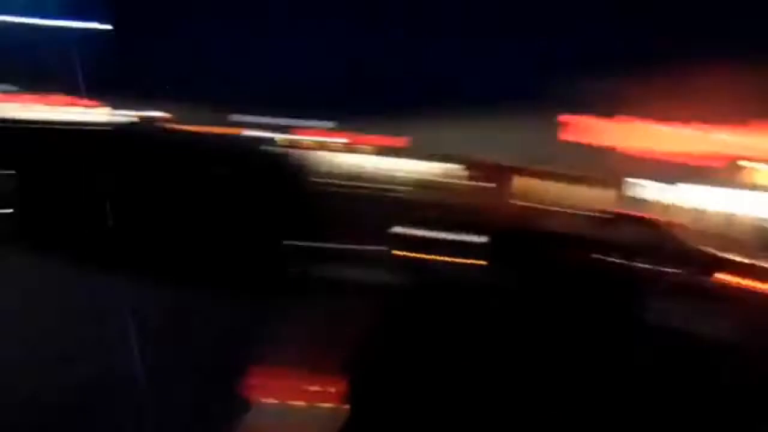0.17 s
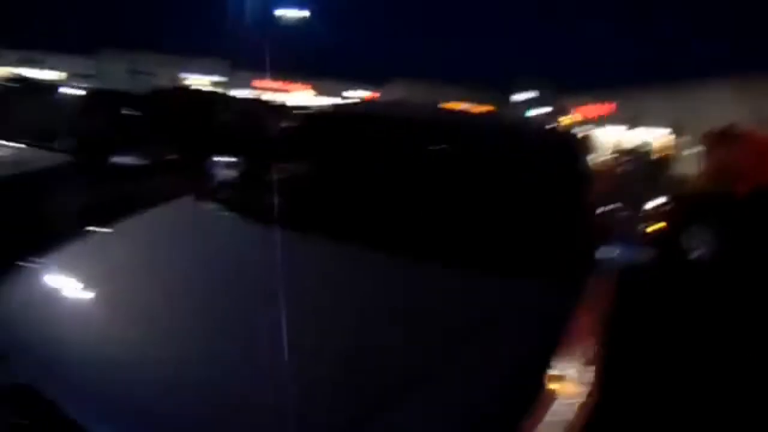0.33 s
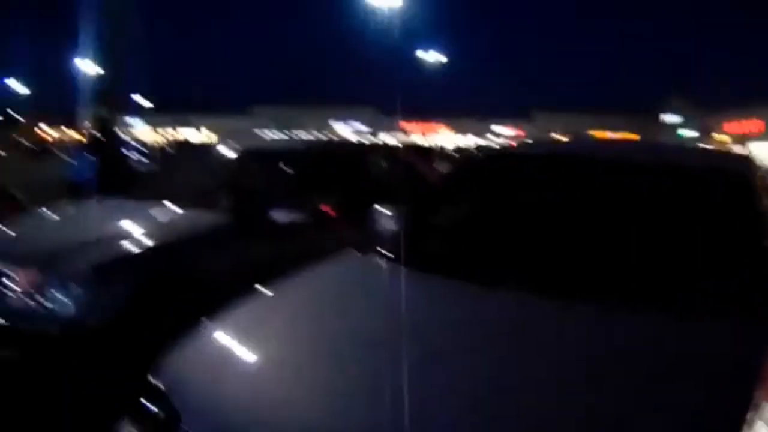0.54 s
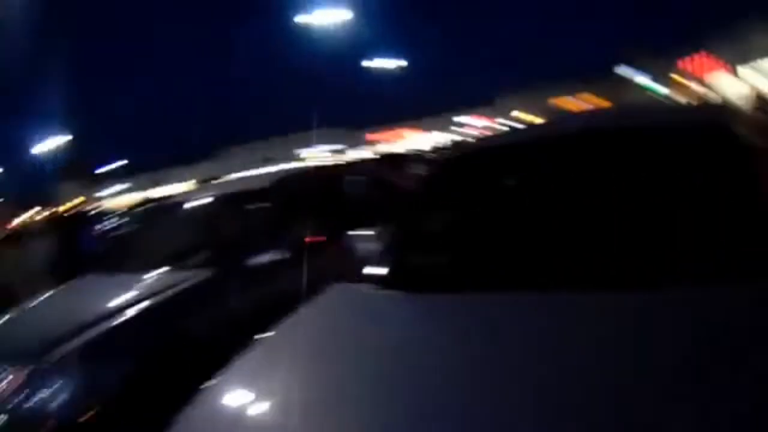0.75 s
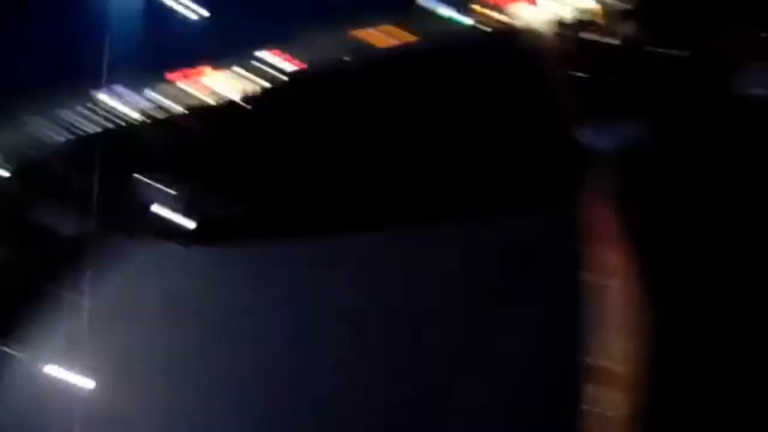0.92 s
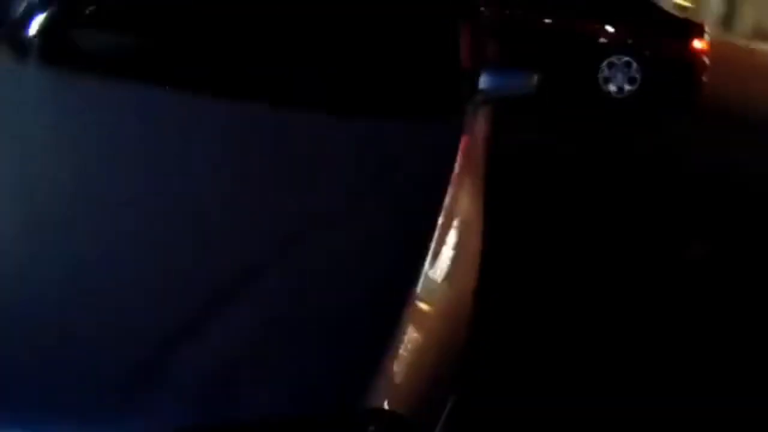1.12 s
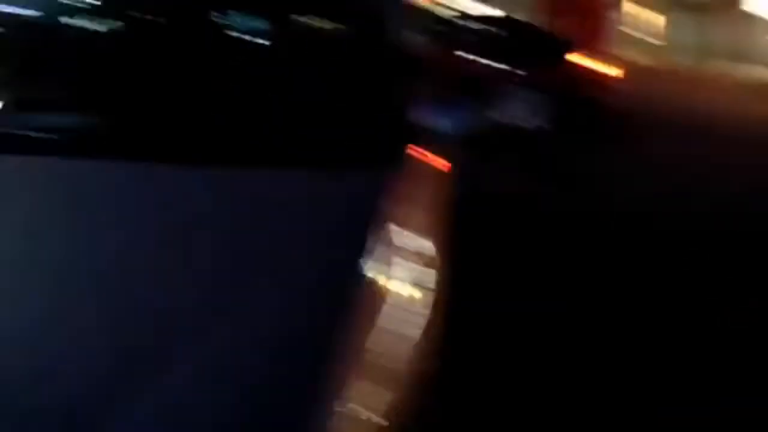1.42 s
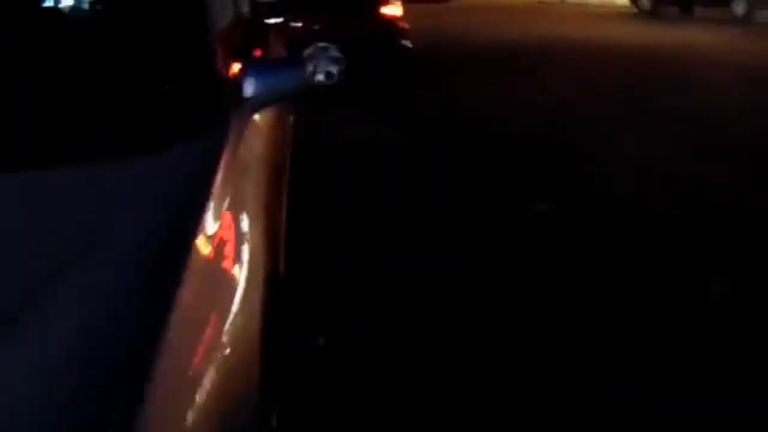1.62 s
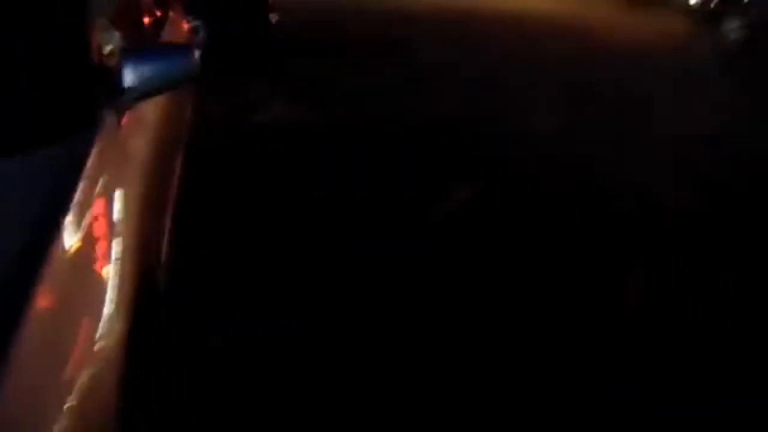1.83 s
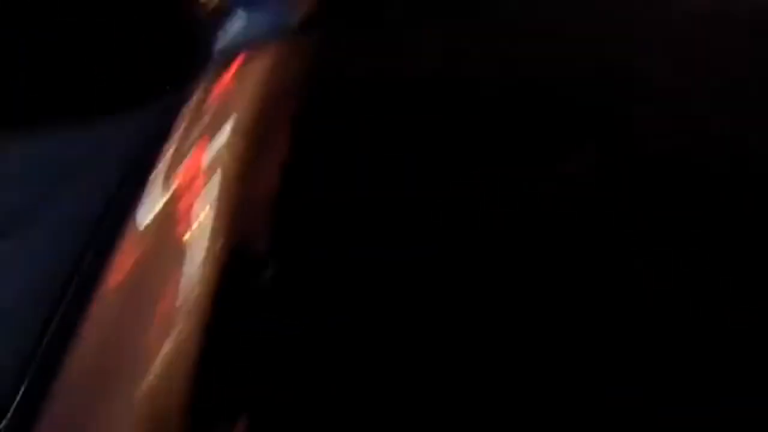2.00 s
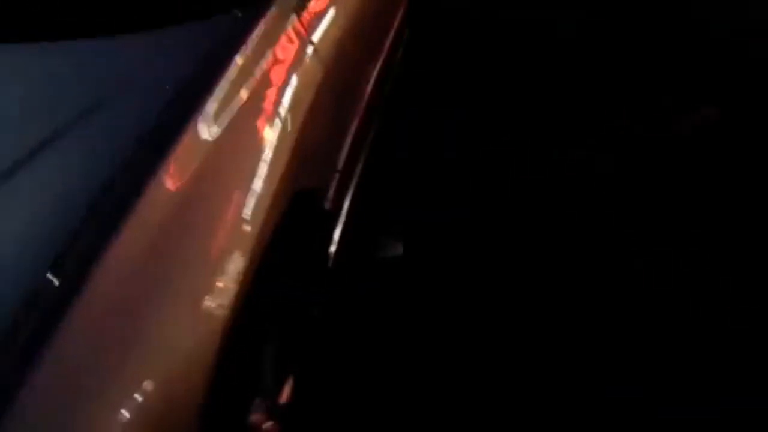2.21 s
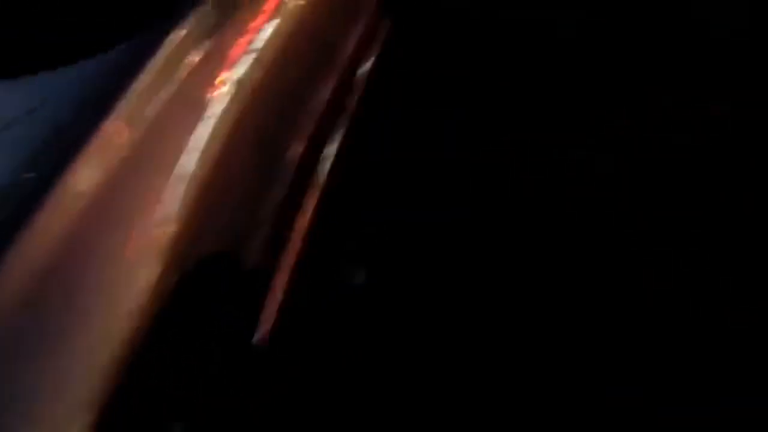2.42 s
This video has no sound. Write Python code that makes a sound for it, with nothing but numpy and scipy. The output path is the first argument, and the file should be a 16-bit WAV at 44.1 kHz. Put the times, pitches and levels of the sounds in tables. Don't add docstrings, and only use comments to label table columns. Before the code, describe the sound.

A car door slams almost at once, very close and overloading the microphone, with a cabin boom and brief key jingle; the background dips and returns, then a soft bump, a latch click and faint ticks.

```python
import sys
import numpy as np
from scipy import signal
from scipy.io import wavfile
from scipy.ndimage import uniform_filter1d

SR = 44100
rng = np.random.default_rng(int(sys.argv[2]) if len(sys.argv) > 2 else 0)


def digitize_waveform(pressure):
    field = np.atleast_2d(pressure).T
    bounded = np.clip(field, -1, 1)
    quanta = np.round(bounded * 32767).astype(np.int16)
    wavfile.write(sys.argv[1], SR, quanta)


def amplitude_ratio(level_db):
    exponent = np.asarray(level_db, float) / 20
    return 10 ** exponent


N = 112454

# pitch_hz, density_db (per Hz)
TRAFFIC_SPECTRUM = [(12, -41), (28, -1), (82, -0.5), (178, -3.5), (242, -25), (357, -15.5), (1510, -24),
                    (13400, -49), (15000, -67)]
TRAFFIC_DB, TRAFFIC_PATCHY_DB = -32.5, 1.2
FAN_HZ, FAN_T60_S, FAN_DB = 1530, 0.026, -50
HISS_DB, HISS_FROM_HZ = -51, 7700

# start_s, firing_pattern_hz, level_db, nearness (0 far to 2 near)
ENGINE_PATH = [
    (0, 36.1, -51.5, 0.16),
    (.5, 35.48, -28, 0.28),
    (.73, 36.34, -35, 0.13),
    (1.26, 36.37, -33, 0.54),
    (1.6, 36.35, -32.5, 0.63),
    (1.95, 36.09, -32.5, 0.96),
    (2.15, 36.3, -31, 1.28),
    (2.3, 36.08, -29.5, 1.534),
    (2.55, 36.28, -29.5, 1.22),
]
# multiple (of firing pattern), level_db
FAR_ORDERS = [(1, 7), (2, 7.5), (3, 6.5), (4, 0), (5, -1), (6, -12.5), (7, -35), (8, -15), (9, -9.5),
              (10, -11), (11, -17), (12, -16), (13, -13), (14, -22)]
# multiple (of firing pattern), level_db
MID_ORDERS = [(1, -42.5), (2, -3), (3, -4.5), (4, 4.5), (5, 0.5), (6, -4.5), (7, -3), (8, -6.5), (9, -3),
              (10, -2), (11, -19), (12, -8), (13, -35), (14, -8.5)]
# multiple (of firing pattern), level_db
NEAR_ORDERS = [(1, -43), (2, -8), (3, 18.5), (4, -6.5), (5, -10), (6, -4.5), (7, -28), (8, -16.5), (9, -14),
               (10, -11), (11, -19), (12, -3), (13, -1), (14, -12.5)]
ORDER_WANDER_DB, ORDER_WANDER_HZ = 2.0, 3.0
# centre_s, length_s, lift_db, pitch_hz
PANEL_BUZZES = [
    (2.1, 0.048, 10, 363),
    (1.98, 0.021, 12, 290),
]
# multiple (of firing pattern), level_db
VALVE_ORDERS = [(19, -13.5), (20, -26), (21, -19), (23, -15.5), (24, -11), (25, -18.5), (26, -16.5)]
VALVE_NEAR_DB, VALVE_WANDER_DB = 9.5, 6.5
# pitch_hz, density_db (per Hz)
CLATTER_SPECTRUM = [(150, -62), (250, -11), (364, -4.5), (397, -12), (600, -16), (844, -11.5),
                    (1210, -16.5), (13500, -48.5), (15000, -61)]
# start_s, level_db
CLATTER_LEVEL = [
    (0, -38.5),
    (.6, -45),
    (1.2, -35.5),
    (1.5, -34),
    (1.8, -34.5),
    (2.05, -31),
    (2.25, -32.5),
    (2.55, -31.5),
]
CLATTER_GATE, CLATTER_PATCHY_DB = 0.13, 1.0

# pitch_hz, density_db (per Hz)
SWING_SPECTRUM = [(12, -36), (20, -24), (48, -11), (143, 0), (192, -10), (313, -2), (359, -7), (5000, -37),
                  (6500, -58), (11000, -120)]
SWING_DB, SWING_END_S = -40.5, 0.29
# start_s, crack_db, panel_db, boom_db
SLAM_CONTACTS = [(0.239, -67, -23.5, -31), (.248, -11.5, -9, -24), (0.25, -9, -5, -9),
                 (0.256, -24, -10, -46), (0.259, -12.5, -4, -8), (0.266, -19, -10, 4.5),
                 (0.278, -22, -41, 5), (.287, -15.5, -3, -5.5), (0.294, -21.5, -7.5, -2),
                 (0.302, -26, -7.5, -19), (0.313, -43, -31, -17), (0.335, -25, -11.5, -13),
                 (.355, -43, -16.5, -24), (0.42, -54, -51, -22)]
# pitch_hz, density_db (per Hz)
CRACK_SPECTRUM = [(710, -9), (1200, 0), (2000, -5), (2800, 0), (4700, -11), (8000, -20), (13500, -24),
                  (15000, -35)]
CRACK_T60_S, PANEL_T60_S = 0.088, 0.092
LATE_S, LATE_CUT_HZ = 0.3, 11500
# pitch_hz, width_hz, level_db
DOOR_SKIN = [(244, 160, 2.5), (194, 40, 1.5), (366, 18, -1.5), (425, 24, -3.5), (446, 52, -0.5),
             (525, 19, -2), (630, 65, -4.5), (687, 46, -6), (850, 140, -2.5), (960, 72, -2.5),
             (1180, 82, -11), (1393, 30, -24.5)]
# pitch_hz, level_db, t60_s
CABIN_BOOM = [(36, -1, 0.42), (66.8, -6.5, 0.22), (144.5, -4, 0.066), (198, 1, 0.072)]
PUSH_HZ = 278
# start_s, level_db
STRIKES = [(0.2487, -15), (0.2506, -4), (.2535, -8), (.2575, -22), (0.2602, -8), (.265, -5), (0.273, -11),
           (0.2787, -6.5), (.2855, -28), (.2915, -10), (.2935, -14), (.301, -32), (.311, -40)]
# pitch_hz, level_db, t60_s
STRIKER_MODES = [(806, -3, 0.066), (958, -1.5, 0.044), (1168, -6.5, 0.017), (2760, -2, 0.017),
                 (3730, -20.5, 0.014), (3980, -11, 0.024)]
STRIKE_T60_S, STRIKE_FROM_HZ, STRIKE_TO_HZ = 0.01, 2300, 6500
# start_s, level_db, pitch_hz, t60_s
SETTLES = [
    (.2925, -4, 192, .14),
    (.362, -13, 62, .25),
    (.415, -11, 100, .3),
    (1.359, -11, 55, .11),
    (1.309, -28, 70, .15),
    (2.34, -27, 62, .2),
]
THUD_S, THUD_DB, THUD_HZ, THUD_T60_S = 0.2603, 11, 58, 0.2
SWAY_S, SWAY_DB, SWAY_HZ, SWAY_T60_S = 0.329, -1, 36, 0.3
TAIL_S, TAIL_DB, TAIL_T60_S, TAIL_CUT_HZ = 0.26, -9.5, 0.48, 1860

# start_s, level_db
JINGLES = [
    (.292, -33),
    (.320, -28),
    (.337, -30),
    (.354, -37),
    (.378, -46),
    (1.3468, -37),
    (1.395, -40),
    (1.405, -43),
]
# pitch_hz, level_db, t60_s
KEY_MODES = [(6300, -5, .01), (8700, -4, .01), (9700, 0, .013), (10800, -3, .01)]
# start_s, level_db
TICKS = [
    (.4943, -30),
    (.7113, -37),
    (1.951, -26),
    (1.9704, -24),
    (1.983, -24),
    (2.01, -33),
    (2.2209, -31),
    (2.2837, -31),
]
# pitch_hz, level_db, t60_s
TICK_MODES = [(1650, -9, .015), (3400, -7, .016), (3800, -7, .015), (4450, -10, .012)]

# start_s, rustle_db, panel_db, boom_db
BUMP_CONTACTS = [
    (0.194, -60, -38, -55),
    (1.31, -34, -19.5, -19),
    (1.342, -35, -32, -14),
    (1.348, -32.5, -32, -27),
    (1.354, -32, -40, -9),
    (1.362, -32, -13, -20),
    (1.381, -29.5, -18.5, -22),
    (1.394, -29.5, -24, -19.5),
    (1.405, -30.5, -19.5, -30),
    (1.453, -60, -19, -20.5),
]
# pitch_hz, density_db (per Hz)
RUSTLE_SPECTRUM = [(1000, -33), (1600, 6), (4800, -10), (7500, -15), (9700, -24), (12000, -21),
                   (14500, -18), (15000, -40)]
RUSTLE_T60_S, SOFT_ATTACK_S, BUMP_CUT_HZ = 0.04, 0.004, 500

# start_s, level_db
LATCH_SNAPS = [
    (1.8557, -13),
    (1.8601, -19),
]
# pitch_hz, level_db, t60_s
LATCH_MODES = [(980, -3, .018), (1210, 0, .024), (1620, -2, .022), (2100, -9, .014), (2600, -16, .006),
               (3000, -16, .012), (3350, -12, .012), (3800, -12, .006), (4400, -13, .006)]
STRENGTH_SPREAD_DB = 1.5
# start_s, length_s, level_db
SCRAPES = [
    (2.06, .05, -44),
    (2.115, .04, -40),
    (2.25, .018, -44),
]

# start_s, depth_db
DUCKS = [
    (0.269, 20),
    (1.36, 2),
]
DUCK_ATTACK_S, DUCK_RELEASE_S = 0.08, 0.84
CLIP_TOP, CLIP_HARDNESS = 0.88, 3.1
MIC_CUT_HZ, RUMBLE_CUT_HZ, CUTOFF_HZ = 30, 4, 14250


def seconds():
    return np.arange(N) / SR


def rms_one(x):
    return x / np.sqrt(np.mean(x ** 2) + 1e-20)


def in_time(rows):
    s, *columns = np.transpose(rows)
    return [np.interp(seconds(), s, c) for c in columns]


def low_pass(x, cut_hz):
    return signal.sosfilt(signal.butter(2, cut_hz, fs=SR, output="sos"), x)


def high_pass(x, cut_hz):
    return signal.sosfilt(signal.butter(1, cut_hz, "high", fs=SR, output="sos"), x)


def band_pass(x, low_hz, high_hz, order):
    return signal.sosfilt(signal.butter(order, [low_hz, high_hz], "band", fs=SR, output="sos"), x)


def drift(rate_hz):
    r = np.exp(-80 * np.pi * rate_hz / SR)
    white = rng.standard_normal(N // 40 + 2002)
    slow = signal.lfilter([1], [1, -2 * r, r * r], white)[2000:]
    return np.interp(np.arange(N) / 40, np.arange(len(slow)), rms_one(slow))


def coloured(spectrum, patchy_db):
    out = 0
    edges = 20 * 2 ** np.arange(0, 10, 0.5)
    white = rng.standard_normal((2, N))
    hz, db = np.transpose(spectrum)
    together = drift(1.01)
    for k, (low, high) in enumerate(zip(edges, edges[1:])):
        if high < hz[0] or low > hz[-1]:
            continue
        band = band_pass(white[k % 2], low, high, 2)
        level_db = np.interp(np.log(low * high) / 2, np.log(hz), db, left=-60, right=-60)
        flicker_db = patchy_db * (0.32 * together + drift(6.7))
        out = out + band * amplitude_ratio(level_db + flicker_db)
    return rms_one(out)


def clicks(s, db):
    out = np.full(N, 1e-18)
    out[(np.asarray(s) * SR).astype(int)] = amplitude_ratio(np.asarray(db))
    return out


def ring(x, hz, t60):
    r, w = amplitude_ratio(-60 / (t60 * SR)), 2 * np.pi * hz / SR
    return signal.lfilter([0, np.sin(w)], [1, -2 * r * np.cos(w), r * r], x)


def dying(s, db, t60):
    return signal.lfilter([1], [1, -amplitude_ratio(-60 / (t60 * SR))], clicks(s, db))


def struck(events, modes):
    s, db = np.transpose(events)
    spread = rng.normal(0, STRENGTH_SPREAD_DB, (len(s), len(modes)))
    rings = 0
    for k, (hz, level_db, t60) in enumerate(modes):
        rings = rings + (-1) ** k * ring(clicks(s, db + level_db + spread[:, k]), hz, t60)
    return band_pass(rings, 0.85 * modes[0][0], 1.15 * modes[-1][0], 3)


def skin():
    white = rng.standard_normal((len(DOOR_SKIN), N))
    modes = enumerate(DOOR_SKIN)
    return rms_one(sum(amplitude_ratio(db) * rms_one(ring(white[k], hz, 1.05 / width)) for k, (hz, width, db) in modes))


def boom(s, db):
    push = low_pass(clicks(s, db), PUSH_HZ)
    return sum(amplitude_ratio(level_db) * ring(push, hz, t60) for hz, level_db, t60 in CABIN_BOOM)


def traffic():
    rumble = amplitude_ratio(TRAFFIC_DB) * coloured(TRAFFIC_SPECTRUM, patchy_db=TRAFFIC_PATCHY_DB)
    fan = rms_one(ring(rng.standard_normal(N), FAN_HZ, FAN_T60_S))
    return rumble + amplitude_ratio(FAN_DB) * fan


def steady_hiss():
    return amplitude_ratio(HISS_DB) * high_pass(rng.standard_normal(N), HISS_FROM_HZ)


def engine():
    hz, db, near = in_time(ENGINE_PATH)
    turn = 2 * np.pi * np.cumsum(hz) / SR
    tables = np.array([FAR_ORDERS, MID_ORDERS, NEAR_ORDERS])[:, :, 1]
    start = rng.uniform(0, 2 * np.pi, len(FAR_ORDERS))
    out = 0
    for k in range(len(FAR_ORDERS)):
        level_db = np.interp(near, [0, 1, 2], tables[:, k])
        level_db += ORDER_WANDER_DB * drift(ORDER_WANDER_HZ)
        for s, length, lift_db, buzz_hz in PANEL_BUZZES:
            if round(buzz_hz / hz.mean()) == k + 1:
                level_db += lift_db * np.exp(-0.5 * ((seconds() - s) / length) ** 2)
        out = out + amplitude_ratio(level_db) * np.sin((k + 1) * turn + start[k])
    for multiple, level_db in VALVE_ORDERS:
        valve_db = level_db + VALVE_NEAR_DB * (near - 1.74) + VALVE_WANDER_DB * drift(4.3)
        out = out + amplitude_ratio(valve_db) * np.sin(round(multiple) * turn + rng.uniform(0, 2 * np.pi))
    clatter = coloured(CLATTER_SPECTRUM, patchy_db=CLATTER_PATCHY_DB) * (1 + CLATTER_GATE * np.cos(turn))
    return amplitude_ratio(db) * out + amplitude_ratio(in_time(CLATTER_LEVEL)[0]) * clatter


def door_swing():
    return amplitude_ratio(SWING_DB) * coloured(SWING_SPECTRUM, patchy_db=2.0) * (seconds() < SWING_END_S)


def slam():
    s, crack_db, panel_db, boom_db = np.transpose(SLAM_CONTACTS)
    noise, panel = coloured(CRACK_SPECTRUM, patchy_db=-1.0), skin()
    dull = low_pass(noise, LATE_CUT_HZ)
    late = s > LATE_S
    crack = dying(s[~late], crack_db[~late], CRACK_T60_S) * noise
    crack += dying(s[late], crack_db[late], CRACK_T60_S) * dull
    diffuse = (panel + 0.29 * low_pass(noise, TAIL_CUT_HZ) + 0.1 * dull)[::-1]
    shudder = dying([TAIL_S], TAIL_DB, TAIL_T60_S) * diffuse
    return crack + dying(s, panel_db, PANEL_T60_S) * panel + boom(s, boom_db) + shudder


def metal_strikes():
    s, db = np.transpose(STRIKES)
    bright = band_pass(rng.standard_normal(N), STRIKE_FROM_HZ, STRIKE_TO_HZ, 1)
    rings = sum(amplitude_ratio(level_db) * ring(clicks(s, db), hz, t60) for hz, level_db, t60 in STRIKER_MODES)
    return dying(s, db, STRIKE_T60_S) * bright + rings


def thud_and_settling():
    thud = -ring(low_pass(clicks([THUD_S], THUD_DB), PUSH_HZ), THUD_HZ, THUD_T60_S)
    sway = ring(low_pass(clicks([SWAY_S], SWAY_DB), SWAY_HZ * 2), SWAY_HZ, SWAY_T60_S)
    knocks = sum(ring(low_pass(clicks([s], db), PUSH_HZ), hz, t60) for s, db, hz, t60 in SETTLES)
    return thud + sway + knocks


def keys():
    return struck(JINGLES, KEY_MODES)


def ticks():
    return struck(TICKS, TICK_MODES)


def bump():
    s, rustle_db, panel_db, boom_db = np.transpose(BUMP_CONTACTS)
    soft = int(SOFT_ATTACK_S * SR)
    rustle = uniform_filter1d(dying(s, rustle_db, RUSTLE_T60_S), soft)
    rustle = rustle * coloured(RUSTLE_SPECTRUM, patchy_db=2.0)
    knock = uniform_filter1d(dying(s, panel_db, PANEL_T60_S), soft) * low_pass(skin(), BUMP_CUT_HZ)
    return rustle + knock + boom(s, boom_db)


def latch():
    return struck(LATCH_SNAPS, LATCH_MODES)


def scrape():
    stroke = 0
    for s, length, db in SCRAPES:
        stroke = stroke + amplitude_ratio(db) * np.sin(np.pi * np.clip((seconds() - s) / length, 0, 1))
    white = rng.standard_normal(N)
    return stroke * rms_one(sum(amplitude_ratio(db) * ring(white, hz, t60) for hz, db, t60 in TICK_MODES))


def scene():
    background = traffic() + steady_hiss() + engine()
    door = door_swing() + slam() + metal_strikes() + thud_and_settling()
    return (background + door + keys() + ticks() + bump() + latch() + scrape())[None]


def top_cut(x):
    return signal.sosfilt(signal.butter(12, 15290, fs=SR, output="sos"), x)


def record(dry):
    duck_db = 0
    for s, depth_db in DUCKS:
        t = np.maximum(seconds() - s, 0)
        duck_db = duck_db + depth_db * (1 - np.exp(-t / DUCK_ATTACK_S)) * np.exp(-t / DUCK_RELEASE_S)
    x = high_pass(dry, MIC_CUT_HZ) * amplitude_ratio(-duck_db) / CLIP_TOP
    x = CLIP_TOP * x / (1 + np.abs(x) ** CLIP_HARDNESS) ** (1 / CLIP_HARDNESS)
    x = signal.sosfilt(signal.ellip(10, 0.3, 65, CUTOFF_HZ, fs=SR, output="sos"), x)
    return top_cut(high_pass(x, RUMBLE_CUT_HZ))


dry = scene()
out = record(dry)
digitize_waveform(out)
```